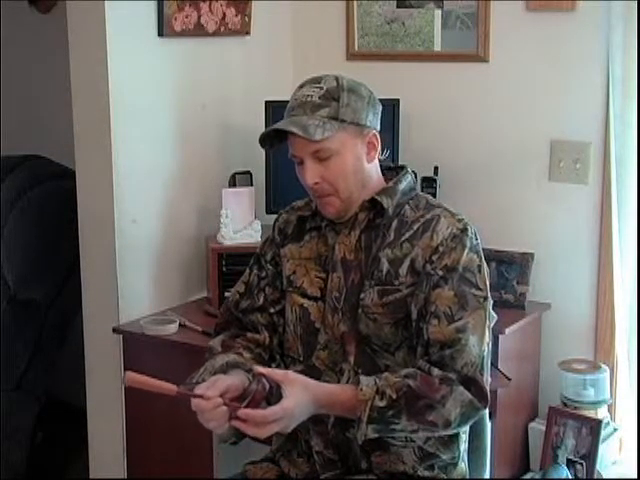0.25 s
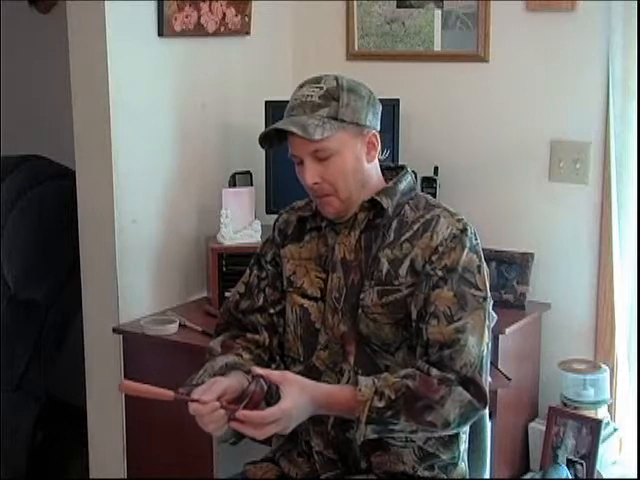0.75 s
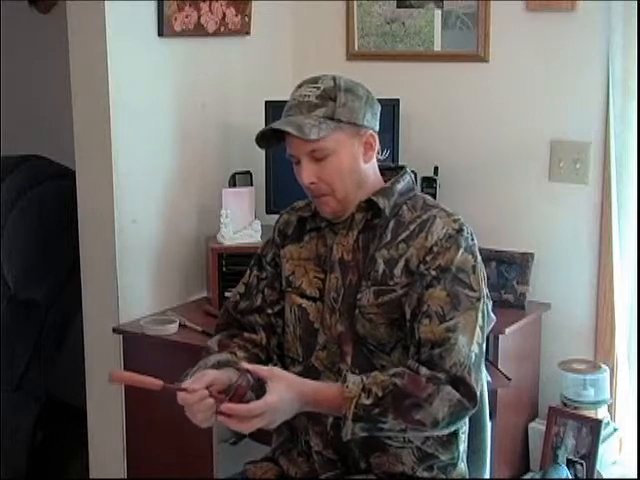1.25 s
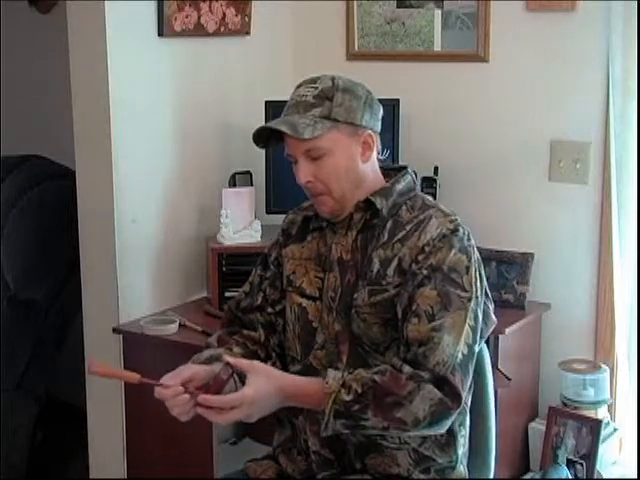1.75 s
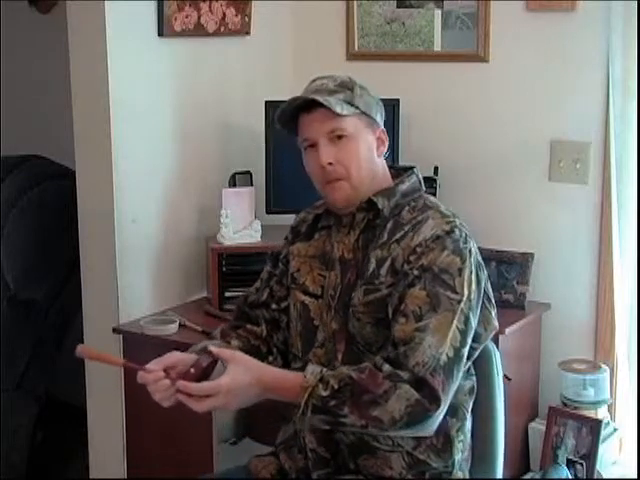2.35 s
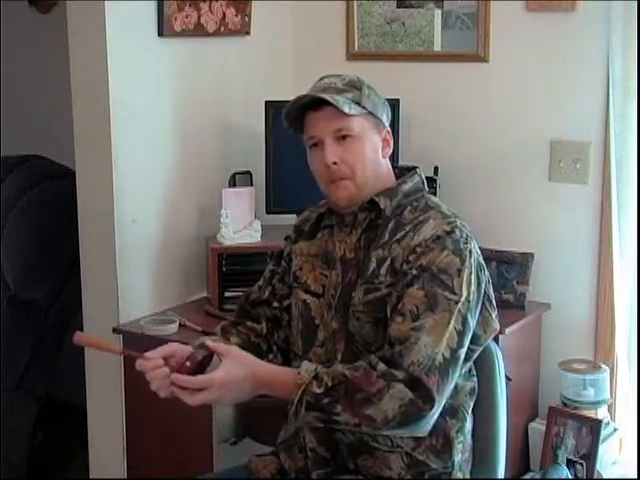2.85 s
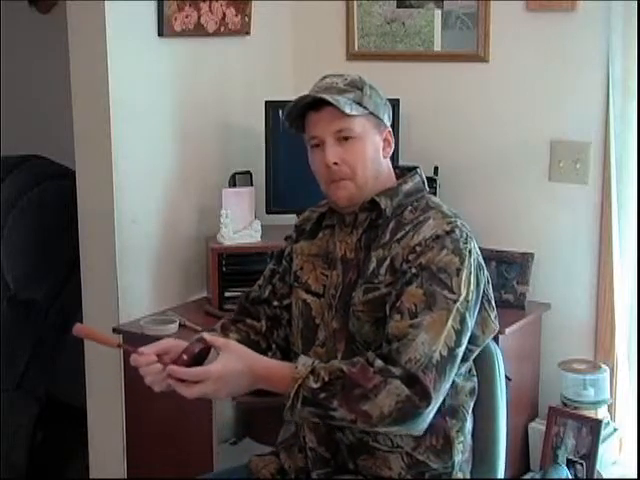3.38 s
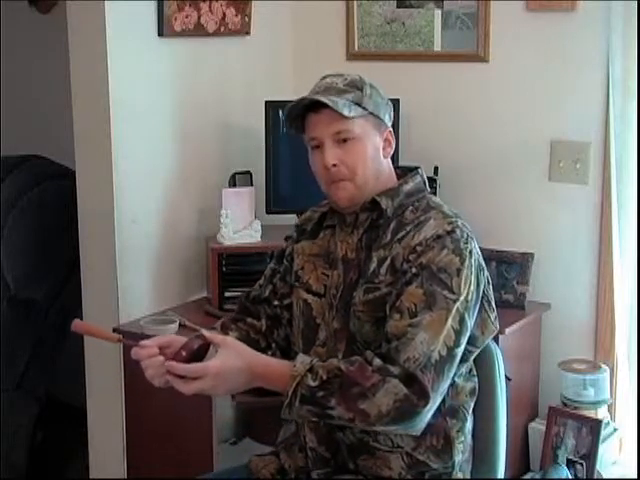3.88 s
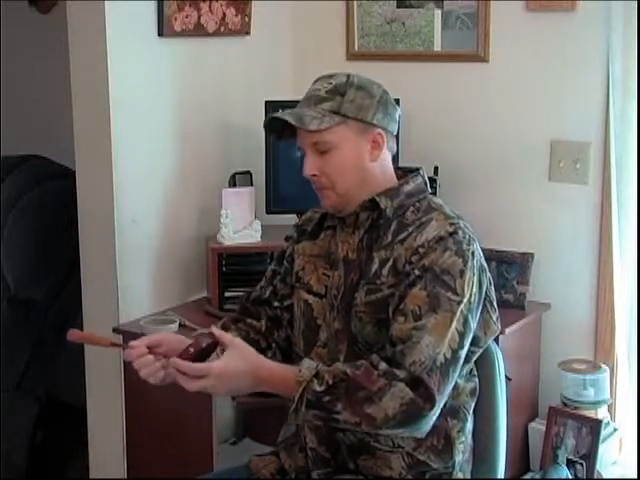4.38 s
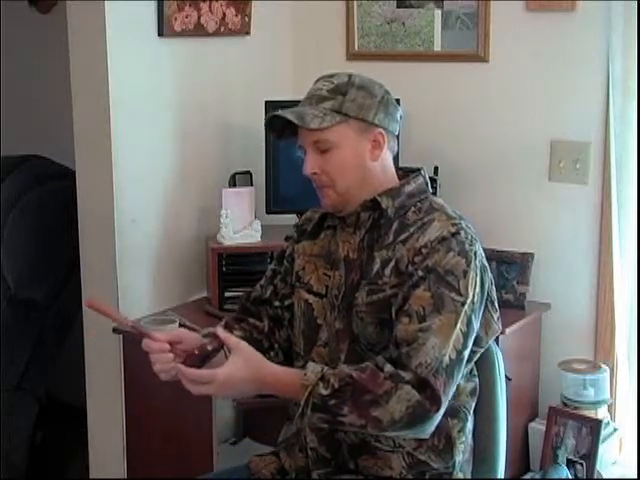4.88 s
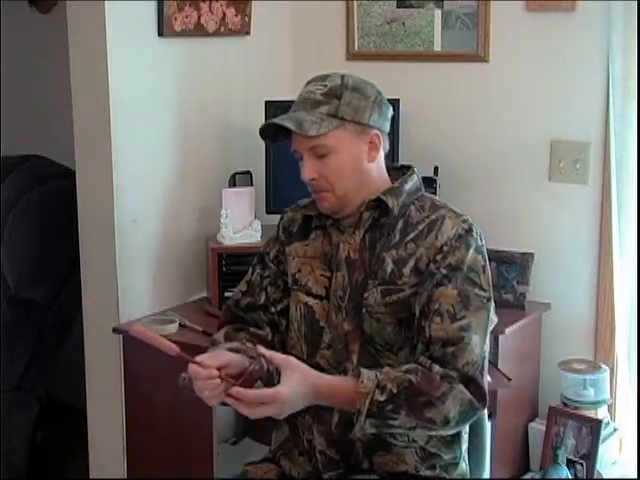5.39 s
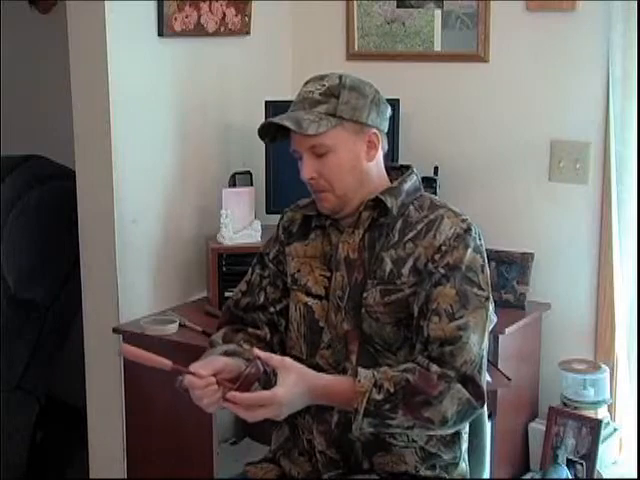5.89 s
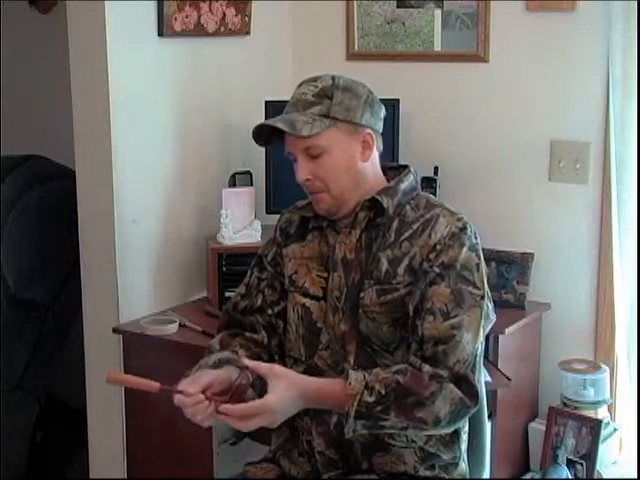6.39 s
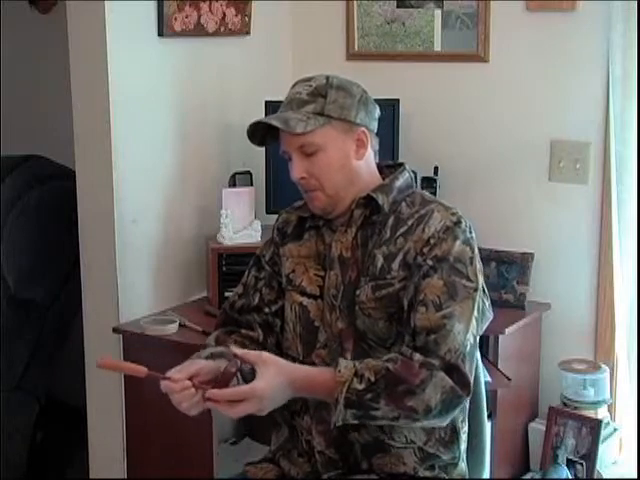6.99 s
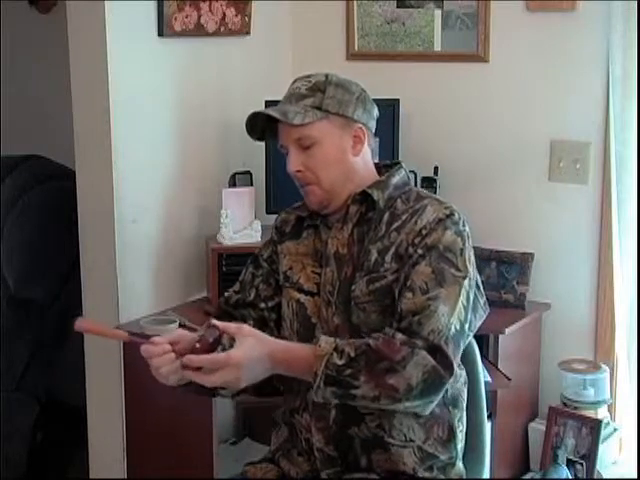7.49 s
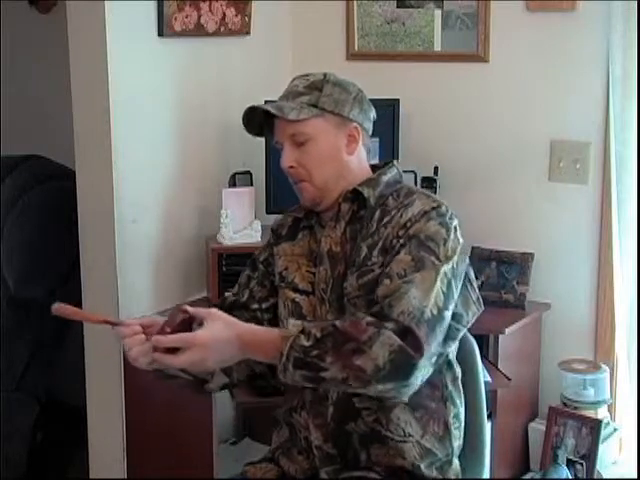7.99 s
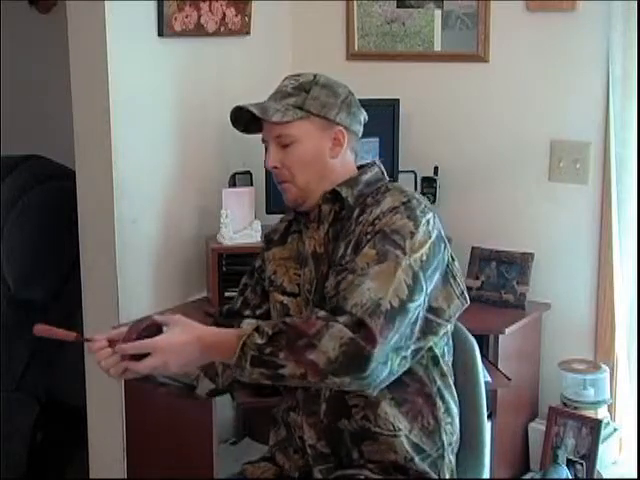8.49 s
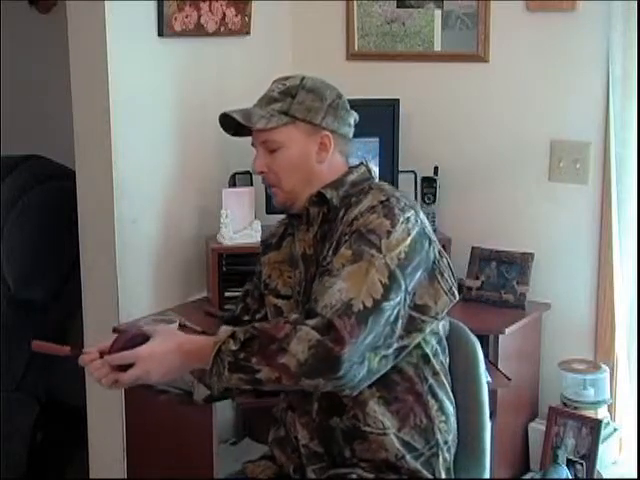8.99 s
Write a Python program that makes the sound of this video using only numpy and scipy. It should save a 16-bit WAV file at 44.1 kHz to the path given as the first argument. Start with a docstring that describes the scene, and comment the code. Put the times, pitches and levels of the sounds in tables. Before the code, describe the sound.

In a small room with faint appliance hum, a glass turkey call is played with a wooden striker a short way from the microphone. Quick, high yelps fall in pitch and break into a scratchy rasp, repeating evenly for about four seconds. The calling pauses with soft handling noise, gives two clipped clucks, then resumes yelping at the same pace. The striker tip occasionally ticks on the glass.

```python
"""A wooden striker drawn across a glass pot call gives a run of yelps, two clucks, then more yelps.
Stick-slip friction drives each yelp: a thin whine, a quick fall to a held note, a break into a low rasp.
The resonances of glass and pot filter the slips, and a small room reverberates. The tip ticks as it
lands and hands bump softly, over appliance hum and room noise that a limiter ducks under loud strokes."""
import sys
import numpy as np
from scipy import signal
from scipy.fft import rfft, irfft, next_fast_len
from scipy.io import wavfile
from scipy.ndimage import minimum_filter1d, map_coordinates

SR = 44100
rng = np.random.default_rng(int(sys.argv[2]) if len(sys.argv) > 2 else 0)


def store_pcm(level_fs):
    """Save levels as 16-bit WAV."""
    pcm = np.round(np.clip(level_fs, -1, 1) * 32767).astype(np.int16)
    wavfile.write(sys.argv[1], SR, np.atleast_2d(pcm).T)


N = 407925
PRE_BITE_S = .06  # a stroke's signal begins this long before the tip bites


def stick_slip(lead, whine_hz, glide, note_hz, bend, hold, rasp_hz, lag, tail,
               whine_db, note_db, rasp_db, fundamental_db, bright_db, rough):
    """Relaxation oscillation: the tip sticks and slips, giving a force with harmonics of the slip rate."""
    t = np.arange(SR // 4) / SR - PRE_BITE_S
    bite = step(t, glide)
    grip = step(t - .001, 0.0017)
    broken = step(t - hold, 0.014)
    since_break = np.maximum(t - hold, 0)
    # as the tip bites, it sticks longer and the slip rate falls
    slip_hz = whine_hz * (1 - bite) + (note_hz + bend * (t - .04)) * bite
    # at the break it drops into uneven chatter, creeping up in pitch as the hand eases off
    chatter_hz = rasp_hz * (1 + rough * (.06 - .1 * np.exp(-since_break / 0.03975)))
    slip_hz += step(t - hold, .004) * (chatter_hz - slip_hz)
    jitter = 0.0019 + 0.012 * rough + 0.028 * (1 - bite) + (.02 + .05 * rough) * broken
    drift = (.002 + rough * (.005 + .01 * broken)) * wobble(90, len(t))
    phase = 2 * np.pi * np.cumsum(slip_hz * (1 + drift + jitter * wobble(900, len(t)))) / SR
    # the whine is nearly a sine; the slips sharpen as the grip builds towards the break
    sharp = step(t - glide, .006)
    strain = np.exp(-((t - hold + 0.011) / 0.0067) ** 2)
    tilt_db = bright_db - 8 * (1 - sharp) + 2.3 * rough * strain - 3.6 * broken
    k = np.arange(1, 25)[:, None]
    slope_db = tilt_db * np.log2(np.maximum(k / 2, 1))
    partials = amp(slope_db - 8 * (1 - grip) * (k > 1) - 8 * (1 - sharp) * (k > 2))
    # chatter gathers its strength in the second partial
    partials[0] *= amp(fundamental_db * bell(slip_hz, 920, 200) - 5.5 * rough * broken)
    partials[2:] *= amp(-3.5 * broken)
    # the bite releases the stored bend of the striker in one soft jolt
    partials[:2] *= amp(6 * np.exp(-((t - .006) / .0055) ** 2))
    pulses = np.sum(partials * np.cos(k * phase) * (k * slip_hz < SR / 2), axis=0)
    pulses *= amp((.5 + 1.8 * rough * broken) * wobble(450, len(t)))
    # gritty bursts, most of all where the tip catches and where it loses its grip
    grit = signal.lfilter([1, -1], [1, -.25], rng.standard_normal(len(t)))
    grit *= (1 + np.cos(phase)) * amp(5 * wobble(300, len(t)))
    catch = amp(-15) * np.exp(-((t - .008) / .016) ** 2)
    crackle = amp(-9) * np.exp(-((t - hold) / .014) ** 2)
    chatter = amp(-19.5) * broken * np.exp(-since_break / .06)
    rub = amp(-18.5) + rough * (amp(-14) * sharp + chatter + crackle)
    scrape = grit * (amp(1.9 * bright_db) * rub + catch)
    # the note strains until it breaks; the rasp swells and fades
    whine = amp(whine_db) * (1 - grip)
    note = amp(note_db + 4.5 * rough ** 2 * strain) * grip * (1 - broken)
    swell_db = np.minimum(180 * (since_break - lag), 170 * (lag - since_break))
    rasp = amp(rasp_db + swell_db) * broken
    contact = step(t + lead, 0.007) * step(hold + tail - t, 0.018)
    return (pulses + scrape) * (whine + note + rasp) * contact


# The tip wanders over the glass and favours different resonances.
# Each row: time in seconds, gain near 2.7 kHz in dB, gain near 5.3 kHz in dB.
TIP_COLOURS = [(0, 2, 9), (1.6, 3.5, 7.5), (2.7, 1, 0.5), (4.202, 3.5, -7.5), (6.6, 3, -10.5),
               (7.301, -0.5, -7), (9.2, -2.5, -2)]
# Drawn strokes. Each row: bite time, lead-in and hold in seconds, whine and rasp pitch in Hz,
# pressure from 0 to 1, relative levels of whine, note and rasp in dB.
YELP_STROKES = [(-.02, 0.0037, 0.036, 1230, 887.5, 0, -21, -11.5, -3),
                (0.299, 0.012, 0.075, 1230, 771, 0.4, -16, -6, -16.5),
                (0.626, 0.01, 0.059, 1260, 875, 0.3, -15, -4.5, -10),
                (0.95, 0.018, 0.053, 1260, 749, 0.1, -7.5, -1, -9),
                (1.261, .014, 0.048, 1260, 654, 0.6, -11, -4.5, 3),
                (1.585, 0.013, .066, 1257, 765.4, 0.6, -9, -2, -4.5),
                (1.925, .022, .027, 1190, 649, 0.7, -12.5, -10.5, 5),
                (2.233, .041, 0.046, 1240, 649.7, 0.76, -14.5, -6, -2),
                (2.549, .021, 0.039, 1240, 635.8, 0.74, -9, -6.5, 3),
                (2.857, 0.02, 0.048, 1220, 638.3, 0.95, -7, -5, 2),
                (3.184, 0.013, .04, 1240, 655.3, 0.81, -11.5, -4.5, 3.5),
                (3.497, 0.026, .04, 1240, 687.4, 1, -11, -3.5, 5),
                (3.833, 0.041, 0.0332, 1230, 916.7, 0.95, -10.5, -2.5, -0.5),
                (4.157, 0.022, 0.039, 1260, 708.7, 0.73, -22.5, 0.5, 2),
                (6.587, 0.04, 0.023, 1045, 919.4, .05, -9.5, -8, -25),
                (6.842, 0.0034, 0.039, 1150, 920.5, 0.27, -2.5, -1, -9.5),
                (7.137, 0.012, 0.047, 1170, 757.6, .4, -8.5, -1, -3.5),
                (7.439, 0.013, 0.054, 1220, 760, 0.6, -13, -5.5, -4.5),
                (7.733, .001, 0.061, 1220, 883.3, 0.6, -37, -5.5, 2),
                (8.017, .003, .049, 1220, 739.5, 0.6, -11, 0, 0),
                (8.306, .002, .056, 1210, 746, .75, -9, -2, 0.5),
                (8.608, 0.0041, 0.041, 1160, 766, .6, 3, 2, -7),
                (8.901, 0.018, 0.059, 1170, 754.5, .45, -6.5, -2, -5),
                (9.195, 0.0074, 0.051, 1180, 780, 0.6, 0.5, -2, -6)]


def yelps():
    """Friction depends on pressure: harder strokes glide longer and sound brighter and rougher."""
    gripping_hz = 892.8
    times, *colours_db = np.transpose(TIP_COLOURS)
    for start, lead, hold, whine_hz, rasp_hz, pressure, whine_db, note_db, rasp_db in YELP_STROKES:
        def pressed(light, hard):
            return np.interp(pressure, [0, 1], [light, hard])

        force = stick_slip(
            lead, whine_hz, glide=pressed(0.0046, 0.0084), note_hz=max(gripping_hz, rasp_hz),
            bend=pressed(450, -200),  # Hz per second: a light note lifts, a hard one sags
            hold=hold, rasp_hz=rasp_hz,
            lag=pressed(0.01, 0.0089),  # seconds from the break to the top of the swell
            tail=pressed(0.095, 0.08),  # seconds from the break until the tip lifts
            whine_db=whine_db, note_db=note_db, rasp_db=rasp_db, fundamental_db=pressed(-2, 5.5),
            bright_db=pressed(-2, 3.5), rough=pressed(0.092, 1.2))
        yield start, force, pot_ring(*(np.interp(start, times, db) for db in colours_db))


# Pecks of the tip, the first very faint. Each row: bite time and lead-in in seconds,
# whine pitch in Hz, relative levels of whine and note in dB.
CLUCK_PECKS = [(5.539, 0.036, 1120, -21.5, -44.5), (5.724, 0.017, 1100, -2, -3),
               (5.93, -.003, 1100, 0.5, -1)]


def clucks():
    """Transient stick-slip: a peck grips only for a moment, at a higher pitch, and barely rasps."""
    for start, lead, whine_hz, whine_db, note_db in CLUCK_PECKS:
        force = stick_slip(
            lead, whine_hz, glide=0.011, note_hz=949, bend=0, hold=.016, rasp_hz=987.4, lag=0, tail=0.018,
            whine_db=whine_db, note_db=note_db, rasp_db=note_db - 1.5,
            fundamental_db=9, bright_db=2.5, rough=0.2)
        landing = step(np.arange(len(force)) / SR - PRE_BITE_S + lead, .001)
        yield start, force * landing, pot_ring(middle_db=-1, upper_db=1)


# Modes of glass and pot. Each row: centre in Hz, width in Hz, relative level in dB.
POT_MODES = [(1123, 435, -18), (1143.6, 28, 4), (1303, 178, -2), (1594, 450, 0), (1757.3, 113, 5.5),
             (1900, 42, 5), (2360, 350, -13), (2644.5, 196, -7.5), (2970, 1240, -15.5), (3648, 200, -18.5),
             (4515, 347, -15), (4836, 93, -17), (5490, 500, -31.5), (7310, 3840, -41), (10700, 8800, -61.5)]


def pot_ring(middle_db, upper_db, size=4096):
    """Modal resonance: the pot's impulse response, its higher modes weighted by where the tip sits."""
    hz = np.fft.rfftfreq(size, 1 / SR)
    gain = np.sqrt(sum((amp(db) * bell(hz, centre, width)) ** 2 for centre, width, db in POT_MODES))
    gain *= amp(middle_db * bell(hz, 2680, 340) + upper_db * bell(hz, 5300, 550))
    # the pot is too small to radiate bass
    gain *= amp(along([(150, -22), (450, -5), (650, -3), (800, -5), (890, -17), (975, -1), (1080, 0)], hz))
    # folding the cepstrum makes the response causal
    cepstrum = irfft(np.log(gain + 1e-6))
    cepstrum[1:size // 2] *= 2
    cepstrum[size // 2 + 1:] = 0
    return irfft(np.exp(rfft(cepstrum)))


# The balance shifts as the pot is moved about. Each row: time in seconds, right-channel gain in dB.
RIGHT_GAIN = [(0, 2.5), (1.3, -1), (4.2, 1), (5.7, -1), (9.2, 0)]


def pot_call():
    """Source and filter: each stroke's force is convolved with the responses of pot and room."""
    out = np.zeros((2, N))
    for start, force, ring in [*yelps(), *clucks()]:
        add(out, in_room(signal.fftconvolve(force, ring), wet_db=-4.5), start - PRE_BITE_S)
    out[1] *= amp(np.interp(np.arange(N) / SR, *np.transpose(RIGHT_GAIN)))
    return out


# Landings of the tip on the glass. Each row: start in seconds, level in dB.
TIP_TICKS = [(0.952, -24.5), (2.238, -23), (5.713, -32), (5.933, -35.5), (8.307, -24)]
# Brushes and bumps: the striker set down at 5.04 s, then hands and arms. Each row: start in seconds, level in
# dB, centre and width in Hz, time to decay by 60 dB in seconds.
HANDLING_BUMPS = [(5.042, -40.5, 1550, 667, 0.17), (5.496, -34, 1730, 540, 0.077),
                  (6.039, -56, 6630, 4940, 0.2), (8.527, -32.5, 306, 352, 0.091),
                  (8.555, -37, 87.4, 44.6, 0.25), (8.804, -49.5, 364, 203, 0.24)]


def handling():
    """Damped impacts: each tick or bump is a band of noise that decays exponentially."""
    out, t = np.zeros((2, N)), np.arange(SR // 3) / SR
    tick_hz, tick_width_hz, tick_t60_s = 3300, 8000, 0.06
    ticks = [(start, db, tick_hz, tick_width_hz, tick_t60_s) for start, db in TIP_TICKS]
    for start, db, centre, width, t60 in ticks + HANDLING_BUMPS:
        band = unit(filtered(rng.standard_normal(len(t)), lambda hz: bell(hz, centre, width)))
        envelope = amp(db - 60 * t / t60) * step(t - .001, 0.000043)
        add(out, in_room(band * envelope, wet_db=-1.0), start)
    return out


# Decay of the small room. Each row: frequency in Hz, reverberation time in seconds.
ROOM_DECAY = [(200, 0.66), (1300, 0.44), (3500, 0.43), (9000, 0.49), (15000, 0.25)]


def in_room(x, wet_db):
    """Reverberation: direct sound arrives first on the left, then a diffuse tail, new for each event."""
    hz, t, spectrum = signal.stft(rng.standard_normal((2, SR // 2)), SR, nperseg=256)
    decay = amp(-60 * t / along(ROOM_DECAY, hz)[:, None])
    tail = signal.istft(spectrum * decay * step(t - .012, 0.0027), SR, nperseg=256)[1]
    paths = amp(wet_db) * tail / np.linalg.norm(tail[0])
    paths[0, 0] += 1
    paths[1, 10] += .65
    return signal.fftconvolve(x[None], paths, axes=1)


# Tones of household appliances. Each row: frequency in Hz, level in dB.
HUM_TONES = [(120, -57), (150, -52.5), (260, -68), (545, -64.5), (15734, -72.5)]
# Spectrum of the room noise. Each row: frequency in Hz, relative spectral density in dB.
AIR_SPECTRUM = [(25, -13), (70, 0.5), (140, -1), (200, -6.5), (400, -10.5), (600, -16), (800, -10),
                (1300, -23.5), (3000, -29.5), (8000, -43.5), (15000, -66.5)]


def background():
    """Superposition: slightly wavering appliance tones, stronger on the left, add to broadband noise."""
    t = np.arange(N) / SR
    hum = np.zeros(N)
    for tone_hz, db in HUM_TONES:
        peak = amp(db + 0.44 * wobble(7.4, N)) * np.sqrt(2)
        hum += peak * np.sin(2 * np.pi * tone_hz * t + .15 * wobble(3, N))
    air = unit(filtered(rng.standard_normal((2, N)), lambda hz: amp(along(AIR_SPECTRUM, hz))))
    return hum * amp([[0], [-9]]) + amp(-52.5) * air


def amp(db):
    """Amplitude ratio of a level in decibels."""
    return 10 ** (np.asarray(db) / 20)


def unit(x):
    """Normalisation to an RMS of one."""
    return x / np.sqrt(np.mean(x ** 2) + 1e-20)


def along(points, hz):
    """Interpolation of (Hz, value) points on a logarithmic frequency axis."""
    knots_hz, values = np.transpose(points)
    return np.interp(np.log(hz + 1), np.log(knots_hz + 1), values)


def wobble(rate, size):
    """Smooth random modulation: a spline through rate knots a second."""
    return map_coordinates(rng.standard_normal(size + 4), [np.arange(size) * rate / SR])


def filtered(x, response):
    """Linear filtering: the spectrum of x times a frequency response."""
    size = x.shape[-1]
    padded = next_fast_len(size + 8192)
    return irfft(rfft(x, padded) * response(np.fft.rfftfreq(padded, 1 / SR)), padded)[..., :size]


def add(out, x, start_s):
    """Superposition of x onto out from start_s on."""
    start = round(start_s * SR)
    x = x[..., max(-start, 0):N - start]
    out[..., max(start, 0):max(start, 0) + x.shape[-1]] += x


def step(t, ramp):
    """A soft transition from 0 to 1 around t = 0."""
    return (1 + np.tanh(t / ramp)) / 2


def bell(hz, centre, width):
    """Resonance curve with steep skirts."""
    return 1 / (1 + (2 * (hz - centre) / width) ** 2)


def scene():
    """Sound pressures add: the call, its handling and the background."""
    return pot_call() + handling() + background()


def limiter(x, ceiling_db, release_db_per_s, attack_s):
    """Automatic gain control: gain drops just ahead of a left-channel peak and climbs back steadily."""
    envelope_db = 20 * np.log10(np.abs(signal.hilbert(x[0])) + 1e-9)
    excess_db = np.maximum(envelope_db - ceiling_db, 0)
    excess_db = -minimum_filter1d(-excess_db, size=240)  # a running maximum looks ahead
    climb_db = release_db_per_s * np.arange(N) / SR
    held_db = np.maximum.accumulate(excess_db + climb_db) - climb_db
    pole = np.exp(-1 / (attack_s * SR))
    return x * amp(-signal.lfilter([1 - pole], [1, -pole], held_db))


def record(dry):
    """Finite dynamic range and bandwidth: the pickup favours the left, hisses, limits and cuts the top."""
    top_hz = 15850
    hiss = amp(-65) * rng.standard_normal((2, N))
    limited = limiter(dry * amp([[0], [-11]]) + hiss, ceiling_db=-4.5, release_db_per_s=59, attack_s=0.0031)
    return filtered(np.clip(limited, -.95, .95), lambda hz: hz < top_hz)


dry = scene()
out = record(dry)
store_pcm(out)
```